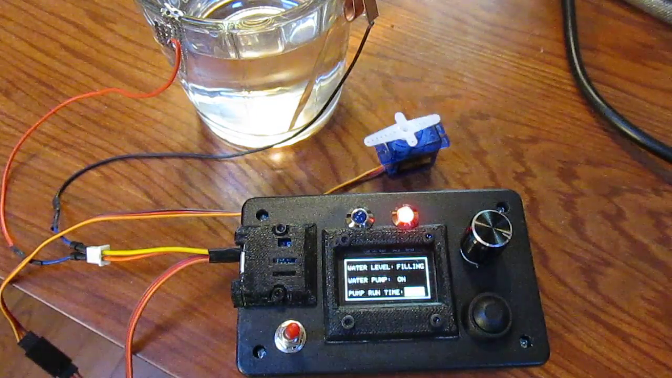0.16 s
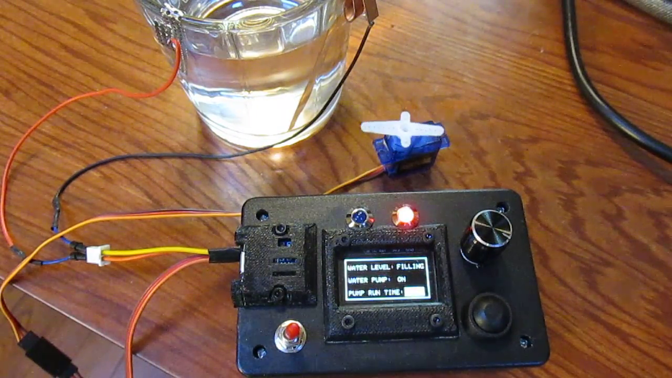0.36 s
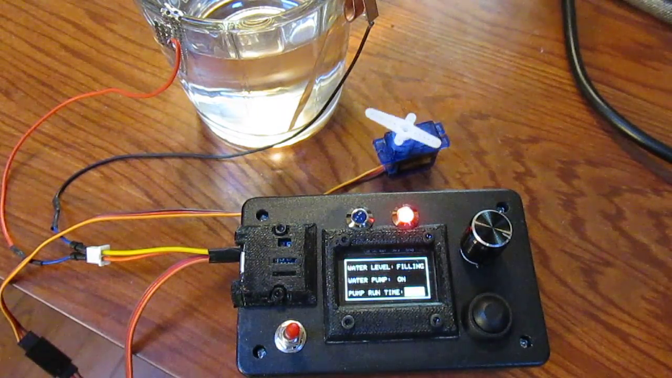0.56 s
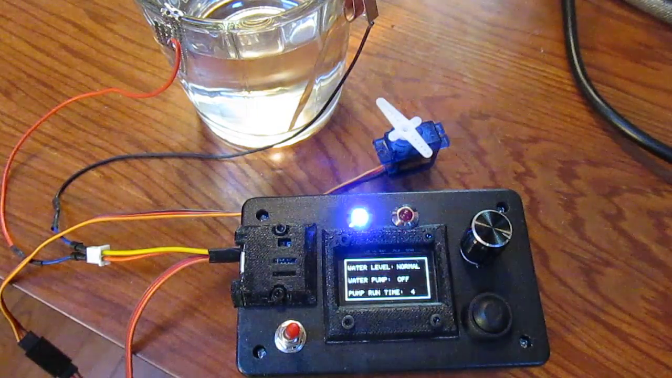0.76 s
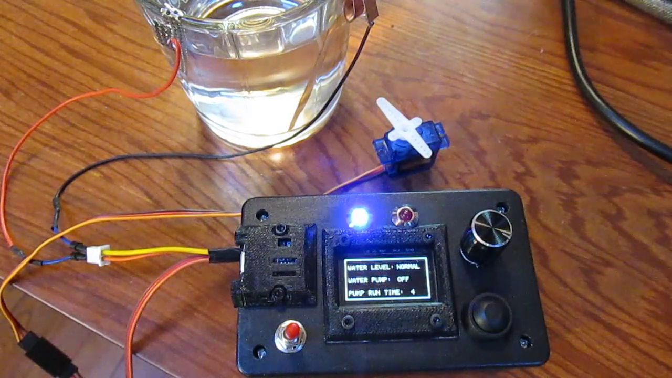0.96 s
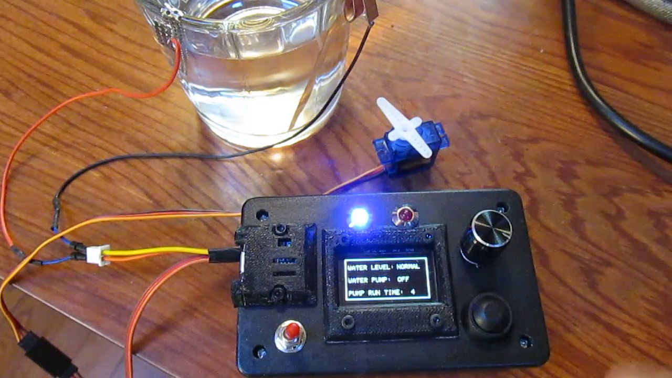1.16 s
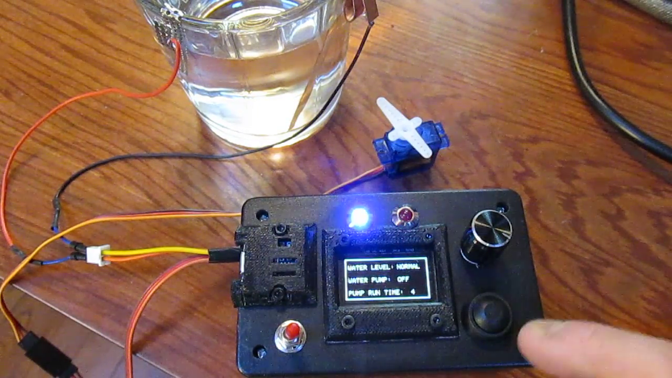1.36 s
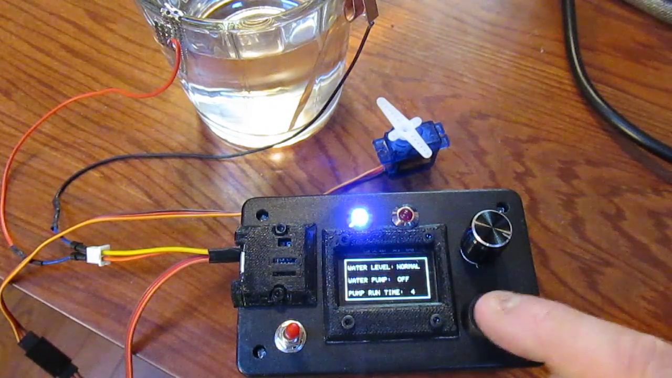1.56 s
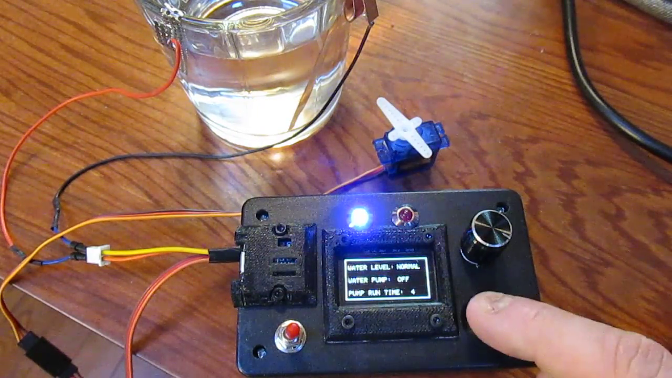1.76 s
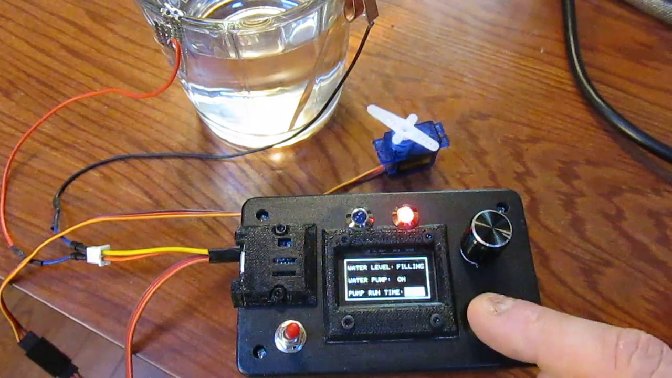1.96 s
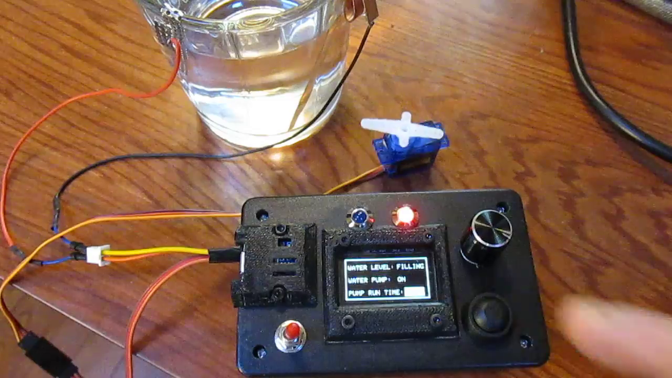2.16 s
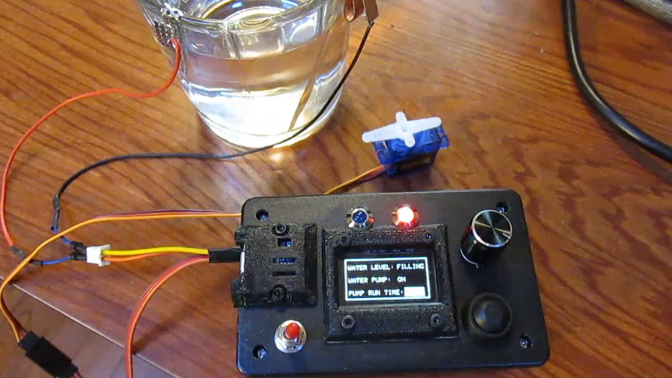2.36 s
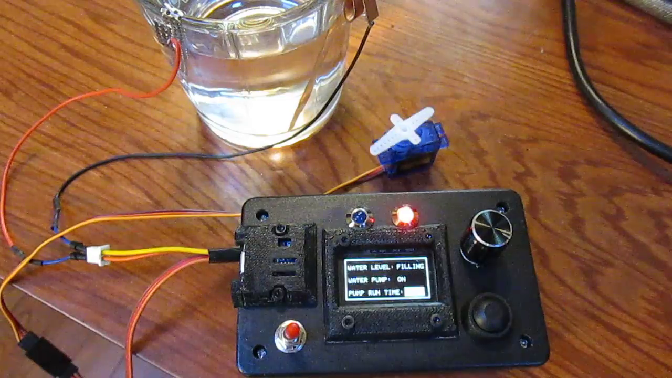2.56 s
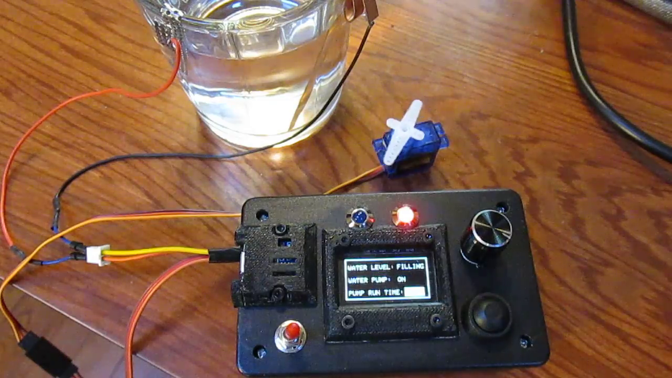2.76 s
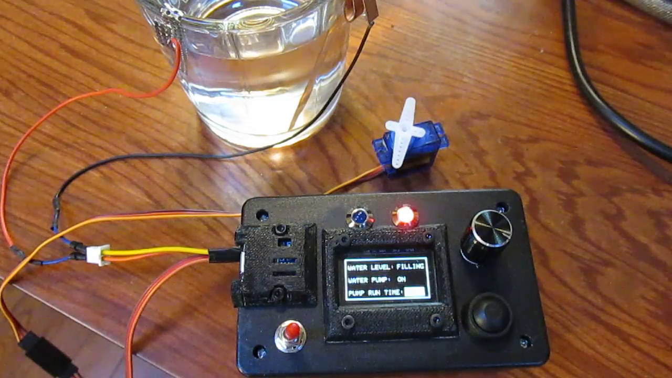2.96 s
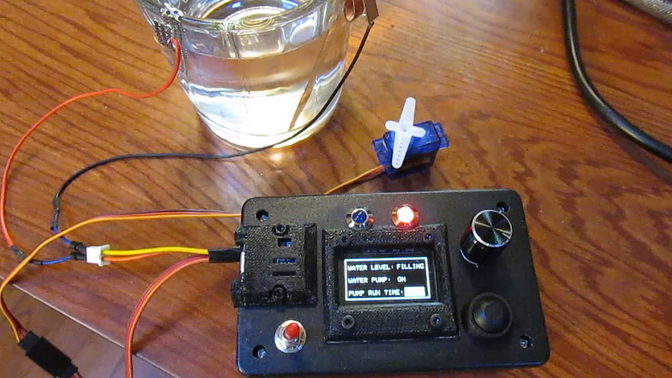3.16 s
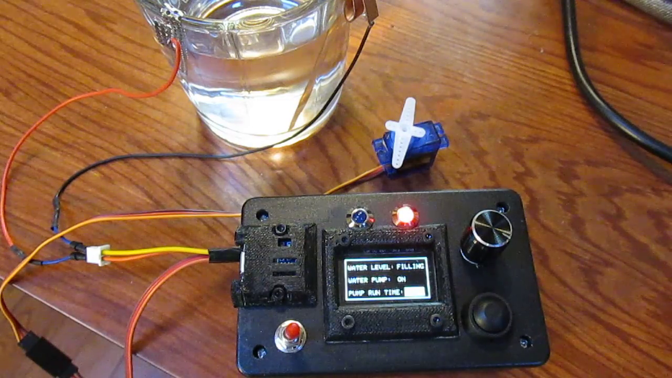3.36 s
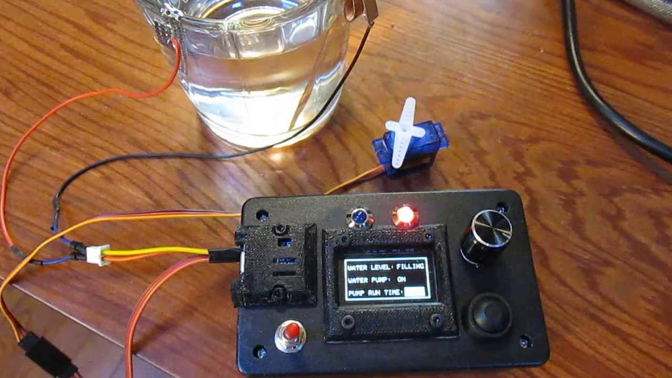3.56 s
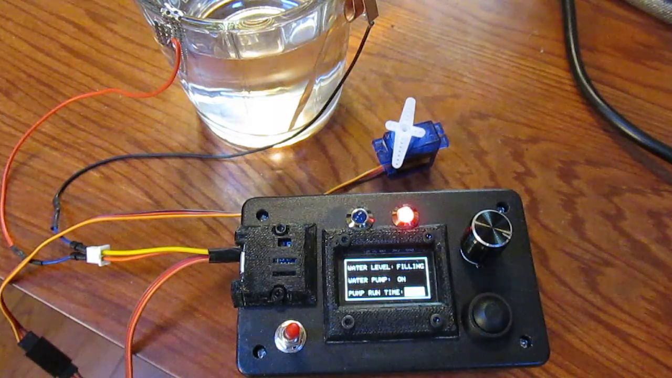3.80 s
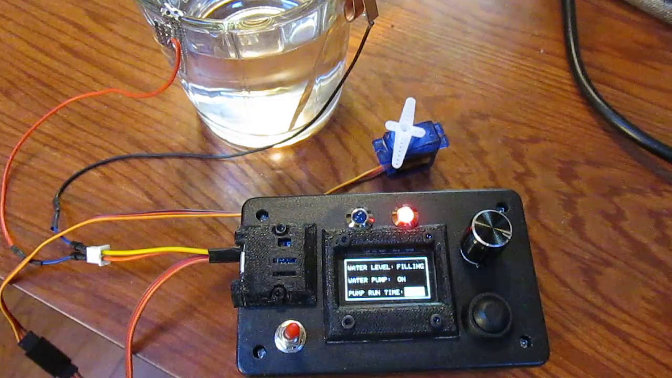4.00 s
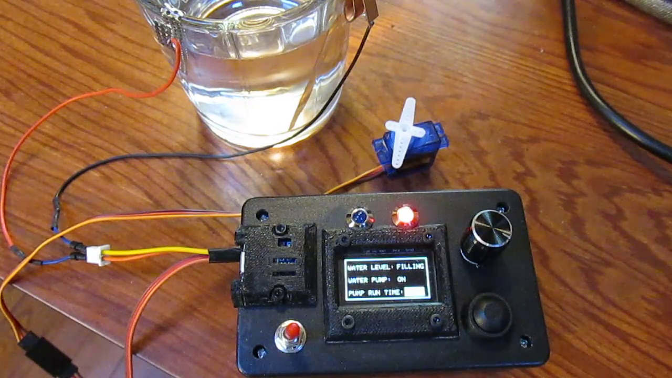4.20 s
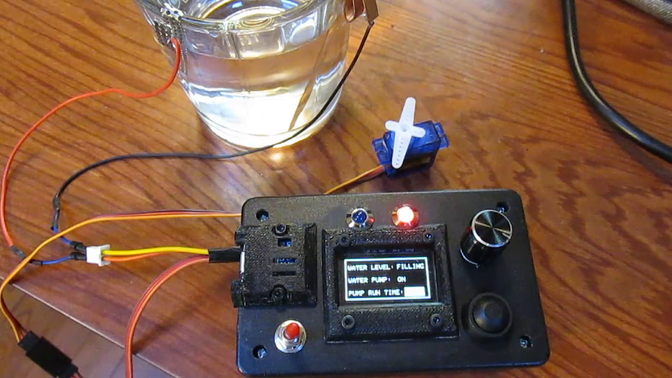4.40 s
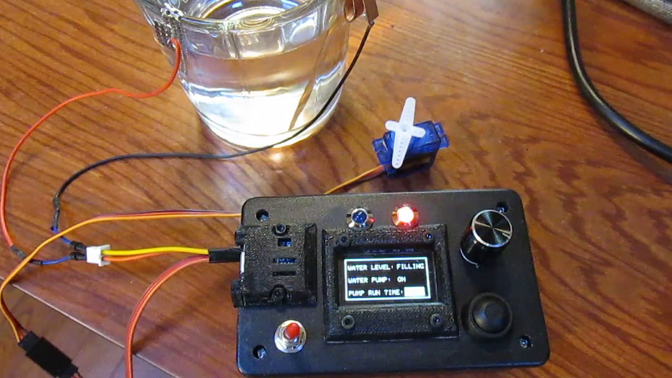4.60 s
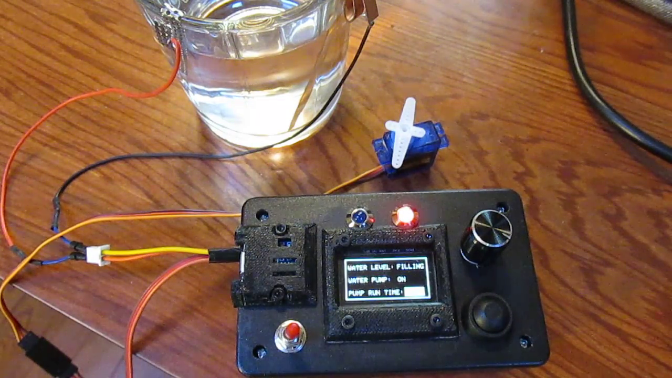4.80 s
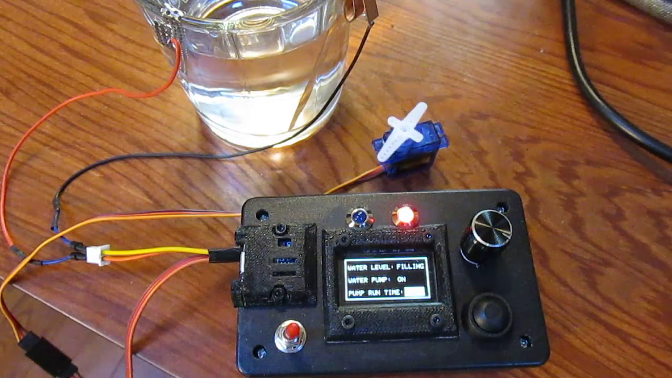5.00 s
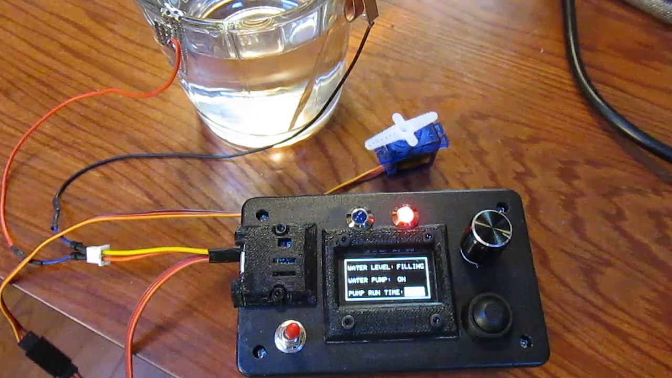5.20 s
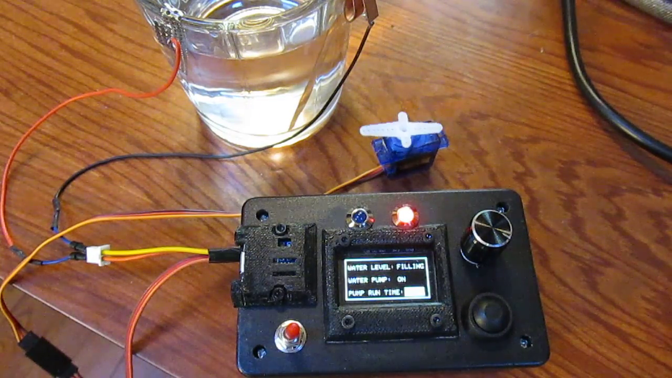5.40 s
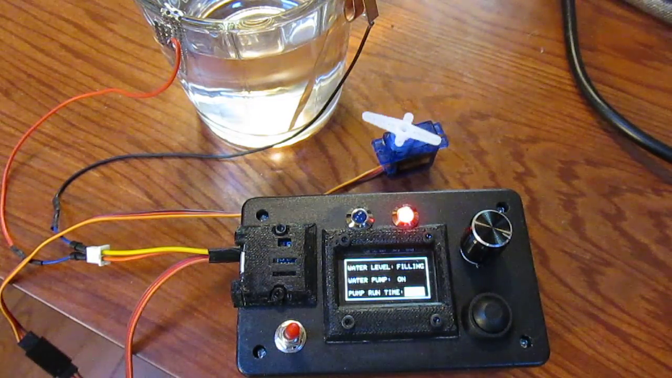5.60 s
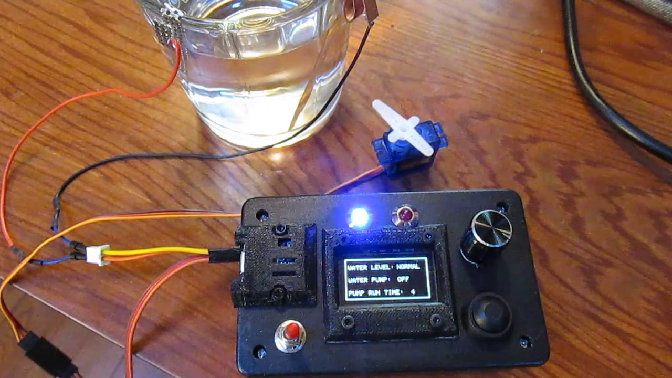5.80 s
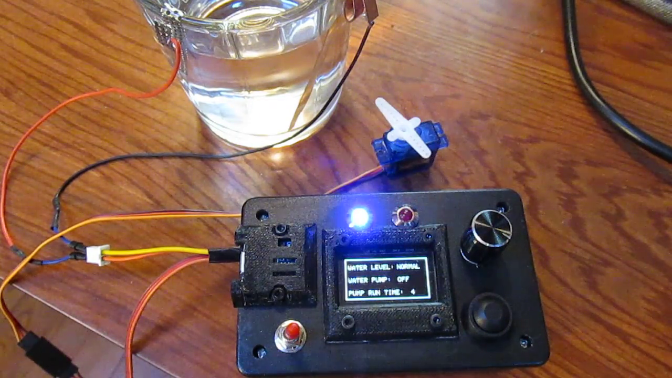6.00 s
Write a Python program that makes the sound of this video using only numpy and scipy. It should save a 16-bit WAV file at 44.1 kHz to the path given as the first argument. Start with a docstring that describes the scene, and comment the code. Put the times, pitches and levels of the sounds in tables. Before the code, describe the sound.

A tiny plastic-geared servo whirs in three scratchy, buzzing bursts on a wooden table, with a push button clicking before the second, over quiet room hiss.

```python
"""A small plastic-geared servo on a wooden table whirs three times: forwards, back, forwards.
Its gear teeth tick and ring the case and the table; the train binds briefly at set places for each direction.
A push button slightly to the right snaps, rings its box and thumps the table; there is also one small tick.
A little room echo follows, over a quiet background of rumble, hiss and wavering hum."""
import sys
import numpy as np
from scipy import signal
from scipy.fft import rfft, irfft, next_fast_len
from scipy.io import wavfile

SR = 44100
rng = np.random.default_rng(int(sys.argv[2]) if len(sys.argv) > 2 else 0)


def to_wav(sig):
    """Store sig (one row per channel, or 1-D mono) as 16-bit WAV at the path in sys.argv[1].

    Samples outside -1..1 are clipped; the rate is SR.
    """
    pcm = np.clip(np.atleast_2d(sig), -1, 1) * 32767
    pcm = np.round(pcm).astype(np.int16)
    wavfile.write(sys.argv[1], SR, pcm.T)  # frames by channels


N = 266760
TIME = np.arange(N) / SR


def servo():
    """Ticks under the mesh level and the binds ring the case and the table; the loaded tooth flank sets the colour."""
    # Ways the case rings. Each row: pitch in Hz, pole width in Hz, relative level forwards in dB,
    # relative level backwards in dB, left over right in dB, lead of the left side in radians.
    case_modes = [(2860, 280, -11.5, -12.5, -2.5, 0.5), (3587, 650, -3, -3.5, -8, -1.2),
                  (4550, 1200, -1, -1.5, -3, 0.8), (5470, 1630, -1.5, -2, 4, -0.3),
                  (6456, 960, 0, 1, -11.5, -1.1), (6750, 340, -3.5, 2.5, 5, -0.5),
                  (7384, 340, 1.5, 6, 3, 4), (7970, 430, 7, 8.5, -5.5, 1.27),
                  (8610, 700, 0.5, 3.5, 9.5, 0.8), (9300, 600, 8.5, 10.5, -4, 1.31),
                  (10410, 1000, 0.5, 7.5, 8.5, -1.3), (11180, 290, 5, -3, -5, -2),
                  (11860, 340, 0, -1.5, -6.5, -3.5), (12520, 1400, 4, -4, -8.5, -5),
                  (13260, 630, 2.5, 3, 0.5, -1.3), (14250, 1000, 1, -2, -2.5, -2.0),
                  (15500, 375, -5, -4, -4, 1.5)]
    # Ways the table rings under the servo, a low group and an upper group.
    # Each row: pitch in Hz, pole width in Hz, relative level in dB.
    table_modes = [
        [(727, 240, -6.5), (873, 180, -9.5), (1000, 145, -2), (1084, 230, -7.5)],
        [(1156, 37, -8.5), (1289, 106, -4.5), (1497, 204, -1.5), (1562, 260, -8.5), (2010, 430, -10.5)],
    ]
    # Sound cancelled by the table's reflection. Each row: pitch in Hz, width in Hz.
    notches = [(3080, 160), (3950, 33), (7850, 140)]
    # Faint hiss after a sweep has stopped.
    # Each row: middle in seconds, level in dB before the case rings, length at half power in ms.
    settling = [(1.095, -65, 20), (6.035, -65.5, 60)]
    servo_db = -12.5
    case_patchy_db, table_patchy_db = 1, 1.5    # spread of each mode's wandering level
    table_pan_db, table_lead_rad = -3.5, -.5    # left over right, and lead of the left side
    # a bind drives high modes harder: share of its rise in dB that a mode follows
    bind_share_at_8khz, bind_share_per_octave = 0.75, 0.4

    mesh, table_levels, binds, back = sweep_levels()
    ticks = gear_ticks(back)
    mesh = np.sqrt(mesh ** 2 + swells(settling)) + 1e-9
    bind_rise = np.maximum(1, np.sqrt(swells(binds)) / np.maximum(mesh, 1e-4))
    side = np.array([[.5], [-.5]])    # left, right
    out = np.zeros((2, N))

    for k, (hz, width_hz, forward_db, backward_db, pan_db, lead_rad) in enumerate(case_modes):
        mode_db = np.where(back, backward_db, forward_db) + servo_db
        gain = from_db(mode_db + side * pan_db + case_patchy_db * drift(13.0))
        share = np.clip(bind_share_at_8khz + bind_share_per_octave * np.log2(hz / 8000), 0, 2)
        force = mesh * bind_rise ** share
        ringing = resonate(force * ticks[k % 2], hz, width_hz)
        out += gain * (ringing * np.exp(1j * side * lead_rad)).real

    # the coupling to the table shifts as the horn swings
    for level, modes in zip(table_levels, table_modes):
        for k, (hz, width_hz, db) in enumerate(modes):
            gain = from_db(db + side * table_pan_db + table_patchy_db * drift(14.4))
            ringing = resonate((level + 1e-9) * ticks[k % 2], hz, width_hz)
            out += gain * (ringing * np.exp(1j * side * table_lead_rad)).real

    for hz, width_hz in notches:
        out = signal.lfilter(*signal.iirnotch(hz, hz / width_hz, fs=SR), out)
    return signal.sosfilt(signal.butter(2, 600.0, "high", fs=SR, output="sos"), out)


def sweep_levels():
    """Each sweep runs up, holds and fades: gives mesh level, two table levels, binds and the latest direction."""
    # Each row: start in seconds, stop in seconds, direction (0 forwards, 1 backwards),
    # extra drive into the table in dB.
    sweeps = [(-0.213, 0.754, 0, -0.05), (1.884, 2.871, 1, 0.4), (4.872, 5.846, 0, -0.75)]
    # Where the gear train binds, one list forwards and one backwards. Each row: middle in seconds into
    # the sweep, level in dB before the case rings, length at half power in ms.
    bind_places = [
        [(.039, -33, 24), (.056, -42, 19), (.115, -34.5, 19), (.168, -35, 16), (.226, -39.5, 26),
         (.274, -39.5, 11), (.34, -34, 18), (.393, -39, 8), (.448, -35.5, 13), (.515, -36.5, 12),
         (.5695, -28.5, 13), (.624, -36, 20), (.682, -33.5, 8), (.747, -35.5, 20), (.796, -33.5, 18),
         (.851, -35.5, 17), (.898, -38.5, 27), (.94, -37.5, 7.2), (.96, -35.5, 13)],
        [(.029, -39, 6.6), (.043, -29.5, 9.6), (.065, -30, 19), (.151, -36.5, 14), (.232, -33, 9.4),
         (.332, -38, 11), (.379, -37, 24), (.401, -34, 8.1), (.472, -39, 4.8), (.495, -36.5, 16),
         (.556, -34.5, 11), (.616, -33, 13), (.691, -37.5, 9.3), (.719, -30, 4.1), (.769, -36.4, 9.3),
         (.792, -35.5, 8.3), (.85, -39, 3.8), (.871, -33.5, 6.1), (.925, -40.5, 19), (.954, -36.4, 5.2)],
    ]
    # How the table takes up the drive along the travel, one list forwards and one backwards.
    # Each row: seconds into the sweep, drive of the low modes in dB, drive of the upper modes in dB.
    table_coupling = [
        [(.03, -55.5, -56.5), (.13, -55, -68.5), (.23, -54, -61), (.33, -57, -61), (.57, -61, -55),
         (.7, -66.5, -58), (.87, -59, -56), (.97, -56.5, -61)],
        [(.035, -54.5, -54), (.115, -60, -65), (.27, -57.5, -61), (.57, -63.5, -64), (.72, -58, -65.5),
         (.87, -65, -64.5), (.98, -62, -60.5)],
    ]
    # pairs: forwards, backwards
    mesh_db = (-42.5, -43)            # tooth drive between binds
    run_up_s = (0.018, 0.036)
    fade_db_per_s = (478, 900)        # after the stop
    run_up_db = 22.0                  # how far below its level a sweep sets in
    table_fade_share = .45            # the table drive fades more slowly: share of the fade in dB
    # lesser binds fall at random in each sweep
    small_binds, small_bind_db, small_bind_spread_db, small_bind_ms = 8, -39.5, 2, 8.7

    levels, back, binds = np.zeros((3, N)), np.zeros(N, bool), []
    for start, stop, way, table_db in sweeps:
        into, way = TIME - start, round(way)
        fade_db = fade_db_per_s[way] * np.maximum(TIME - stop, 0)
        run_up = -run_up_db * np.clip(1 - into / run_up_s[way], 0, 1)
        shape_db = run_up - np.outer([1, table_fade_share, table_fade_share], fade_db)
        s, low_db, upper_db = np.transpose(table_coupling[way])
        held_db = [np.full(N, mesh_db[way]),
                   np.interp(into, s, low_db) + table_db,
                   np.interp(into, s, upper_db) + table_db]
        levels += (into >= 0) * from_db(np.maximum(held_db + shape_db, -200))
        back[into >= 0] = way
        binds += [(start + s, db, ms) for s, db, ms in bind_places[way]]
        for place, size in rng.random((small_binds, 2)):
            # sqrt(12) turns an even spread between 0 and 1 into one of standard deviation 1
            db = small_bind_db + small_bind_spread_db * np.sqrt(12) * (size - .5)
            binds.append((start + place * (stop - start), db, small_bind_ms))
    return levels[0], levels[1:], binds, back


def gear_ticks(back):
    """Uneven tooth contacts over a rub pulse with the shaft; gives two stereo trains for neighbouring modes."""
    teeth_per_s, spacing_jitter = 820, .25     # jitter as a share of the tooth rate
    tooth_spread_db, rub_share = 3.5, .5
    scatter = .2                               # share of power reaching each side by its own path
    shaft_hz, shaft_db = 87.2, 2.0
    # brief dips where the teeth run in their backlash: steady scale and what an opening adds
    slack_db, open_slack_db = 1, 4.5
    # backwards, the backlash opens once a turn of a wheel: rate, a moment when widest, level lost then
    wheel_per_s, widest_s, open_loss_db = 16.8, 2.477, 2.5

    teeth = np.cumsum(teeth_per_s / SR * np.maximum(0, 1 + spacing_jitter * drift(teeth_per_s)))
    struck = np.diff(np.floor(teeth), prepend=0) > 0
    slack = rms_one(resonate(rng.standard_normal(N), 80.0, 73.0).real)
    sizes = from_db(tooth_spread_db * np.minimum(rng.exponential(1, N), 3.0))
    # each contact rattles for a fraction of a millisecond
    burst = signal.lfilter([1], [1, -.93], struck * sizes)

    turn = 2 * np.pi * shaft_hz * TIME + 0.55 * drift(4.7)
    opening = back * np.cos(np.pi * wheel_per_s * (TIME - widest_s)) ** 2
    play_db = (slack_db + open_slack_db * opening) * np.minimum(slack, .3) - open_loss_db * opening
    pulse = from_db(shaft_db * np.cos(turn) + play_db)

    # axes: train, side, time
    shared_noise = np.sqrt(1 - scatter) * rng.standard_normal((2, 1, N))
    own_noise = np.sqrt(scatter) * rng.standard_normal((2, 2, N))
    contact = rub_share + (1 - rub_share) * rms_one(burst)
    return rms_one(pulse * contact * (shared_noise + own_noise))


def button():
    """The dome snaps with a bright crack and rings the box; the push thumps softly into the table."""
    # Contacts of the button. Each row: time in seconds, strength of the ring in dB, hardness in dB per
    # octave, strength of the crack in dB, left over right in dB.
    contacts = [(1.087, -49, -22, -60, -5), (1.808, -41, -15, -41, 0), (1.813, -33.5, -5, -40, -7),
                (1.8256, -35, -10, -45.5, -3), (1.878, -66, 0, -46, -1), (2.0374, -36, -14, -60, -4),
                (2.0428, -31, 9, -20.5, -3), (2.0488, -32, -1, -42, -2)]
    # Ways the box rings. Each row: pitch in Hz, relative level in dB, seconds to fall by 60 dB.
    box_modes = [(1100, -15, 0.019), (1800, -6, 0.03), (2250, -2.5, 0.012), (2720, -6.5, .014),
                 (3230, -5.5, 0.019), (3980, -6, 0.02)]
    # The finger's pushes into the table. Each row: time in seconds, strength in dB.
    pushes = [(1.814, -44), (1.8265, -42), (1.831, -35), (2.045, -38)]
    # Ways the table thumps. Each row: pitch in Hz, relative level in dB, seconds to fall by 60 dB.
    thump_modes = [(158.7, -7, 0.43), (246.5, -5.5, 0.14), (325, -7.5, 0.094), (486, -4, 0.049)]
    crack_hz, crack_t60_s = 3400, 0.011
    click_soft_hz, push_soft_hz = 3230, 510    # contacts last a moment and so lose their top

    s, ring_db, hard_db, crack_db, pan_db = np.transpose(contacts)
    at = np.round(s * SR).astype(int)
    pan = from_db(np.outer([.5, -.5], pan_db))

    box = np.zeros((2, N))
    for hz, db, t60 in box_modes:      # a harder snap reaches the higher modes
        clicks = np.zeros((2, N))
        clicks[:, at] = pan * from_db(ring_db + db + hard_db * np.log2(hz / box_modes[1][0]))
        box += ring(soften(clicks, click_soft_hz), hz, t60)
    # the small box radiates no bass
    box = signal.sosfilt(signal.butter(4, 950.0, "high", fs=SR, output="sos"), box)

    snaps = np.zeros((2, N))
    snaps[:, at] = pan * from_db(crack_db)
    dying = signal.lfilter([1], [1, -from_db(-60 / (crack_t60_s * SR))], snaps + 1e-18)
    noise = rng.standard_normal(N) + 1.4 * rng.standard_normal((2, N))
    crack = signal.sosfilt(signal.butter(2, crack_hz, "high", fs=SR, output="sos"), dying * noise)

    push = np.zeros(N)
    push[[round(s * SR) for s, db in pushes]] = from_db([db for s, db in pushes])
    push = soften(push, push_soft_hz)
    thump = sum(from_db(db) * ring(push, hz, t60) for hz, db, t60 in thump_modes)
    return box + crack + thump


def lone_tick():
    """One dry click into a few very short rings."""
    # Each row: pitch in Hz, level in dB, seconds to fall by 60 dB.
    tick_modes = [(5500, -48, 0.013), (5970, -46, 0.014), (4670, -54, .02), (3700, -60, .005)]
    click = np.arange(N) == round(3.7834 * SR)    # time in seconds
    return sum(ring(from_db(db) * click, hz, t60) for hz, db, t60 in tick_modes)


def room(x):
    """Echoes from eight feedback delays a side, duller on every round."""
    t60_s, wall_cut_hz = 0.3, 3700
    size = next_fast_len(N + SR)
    w = 2 * np.pi * np.arange(size // 2 + 1) / size
    dull = np.exp(-2 * np.pi * wall_cut_hz / SR)
    wall = (1 - dull) / (1 - dull * np.exp(-1j * w))
    out = np.zeros((2, len(w)), complex)
    for k, lag in enumerate(rng.uniform(.008, .035, 16) * SR):
        loop = from_db(-60 * lag / SR / t60_s) * wall ** 0.2 * np.exp(-1j * w * round(lag))
        out[k % 2] += (-1) ** (k // 2) * loop / (1 - loop)
    return irfft(out * rfft(x, size), size)[:, :N]


def room_tone():
    """Half-octave bands of stereo noise make rumble and hiss, with a wavering hum of narrow noise."""
    # Colour of the noise. Each row: pitch in Hz, relative level in dB per Hz.
    tone_colour = [(20, 0), (60, 2), (120, -3), (230, 0), (330, -11), (500, -13), (1000, -17.5),
                   (1500, -21), (2200, -25), (3200, -26.5), (6000, -29), (10000, -28), (13000, -31.5),
                   (16000, -38)]
    # How alike the two sides are. Each row: pitch in Hz, left-right likeness (1 means the same).
    likeness = [(60, -0.18), (180, 0.23), (550, 0.3), (1650, 0.047), (4970, 0.0041), (15000, 0.14)]
    # Wavering hum. Each row: pitch in Hz, pole width in Hz, level in dB.
    hum_bands = [(121.5, 13.5, -63), (218.3, 12.7, -61.5), (151.2, 28, -64), (317.7, 41, -69.5)]
    tone_db = -52

    out, edges = 0, 20 * 2 ** np.arange(0, 10, .5)
    white = rng.standard_normal((2, 2, N + SR))
    for k, (low, high) in enumerate(zip(edges, np.append(edges[1:], .45 * SR))):
        band = signal.butter(2, [low, high], "band", fs=SR, output="sos")
        mid, side = signal.sosfilt(band, white[k % 2])[:, SR:]    # skip the filter's start
        hz = np.sqrt(low * high)
        alike = np.clip(at_hz(likeness, hz), -1, 1)
        stereo = np.sqrt(1 + alike) * mid + np.sqrt(1 - alike) * side * [[1], [-1]]
        out = out + from_db(at_hz(tone_colour, hz)) * stereo
    noise = rng.standard_normal(N) + 0.74 * rng.standard_normal((2, N))
    hum = sum(from_db(db) * rms_one(resonate(noise, hz, width_hz).real) for hz, width_hz, db in hum_bands)
    return from_db(tone_db) * rms_one(out) + hum


def resonate(x, hz, width_hz):
    """One mode as a complex double pole, so its phase can differ between the sides; keeps the power of noise."""
    r = np.exp(-np.pi * width_hz / SR)
    pole = r * np.exp(2j * np.pi * hz / SR)
    return signal.lfilter([np.sqrt(2 * (1 - r * r) ** 3 / (1 + r * r))], [1, -2 * pole, pole ** 2], x)


def ring(clicks, hz, t60):
    """A unit click sets a sine of height 1 ringing, which falls by 60 dB in t60 seconds."""
    r, w = from_db(-60 / (t60 * SR)), 2 * np.pi * hz / SR
    return signal.lfilter([0, np.sin(w)], [1, -2 * r * np.cos(w), r * r], clicks + 1e-18)


def soften(clicks, hz):
    """Spread clicks into short pushes."""
    r = np.exp(-2 * np.pi * hz / SR)
    return signal.lfilter([(1 - r) ** 2], [1, -2 * r, r * r], clicks + 1e-18)


def swells(rows):
    """Summed power of flat-topped swells, each centred on its time and at half power at its ends."""
    power = 0
    for s, db, ms in rows:
        distance = np.abs((TIME - s) / (ms / 2000))    # in half lengths
        power = power + from_db(2 * db) * np.exp(-np.log(2) * distance ** 3)
    return power


def drift(rate):
    """Slow random wandering of rms 1; a higher rate in Hz wanders faster."""
    r = np.exp(-2 * np.pi * rate / SR)
    return rms_one(signal.lfilter([1], [1, -2 * r, r * r], rng.standard_normal(N + SR))[SR:])


def at_hz(points, hz):
    """Read a spectrum table on a log-frequency axis."""
    return np.interp(np.log(hz), np.log(np.array(points)[:, 0]), np.array(points)[:, 1])


def rms_one(x):
    """Scale to unit rms."""
    return x / np.sqrt(np.mean(x ** 2) + 1e-20)


def from_db(db):
    """Decibels to gain."""
    return 10 ** (np.asarray(db) / 20)


def scene():
    """Servo, button and tick with their room echo, over the room tone."""
    room_db = -17.5
    near = servo() + button() + lone_tick()
    return near + from_db(room_db) * room(near.mean(axis=0)) + room_tone()


def record(dry):
    """A steep filter cuts the top above 15.8 kHz."""
    return signal.sosfilt(signal.ellip(12, .5, 75, 15800, fs=SR, output="sos"), dry)


dry = scene()
out = record(dry)
to_wav(out)
```